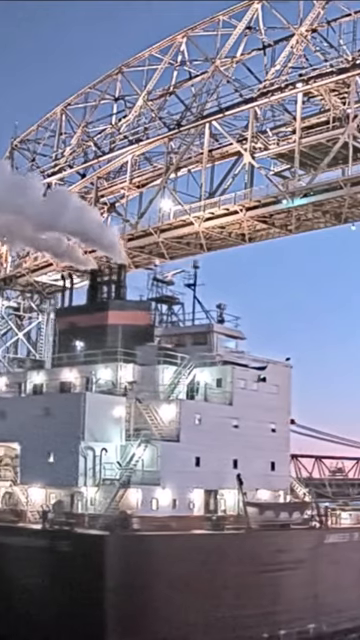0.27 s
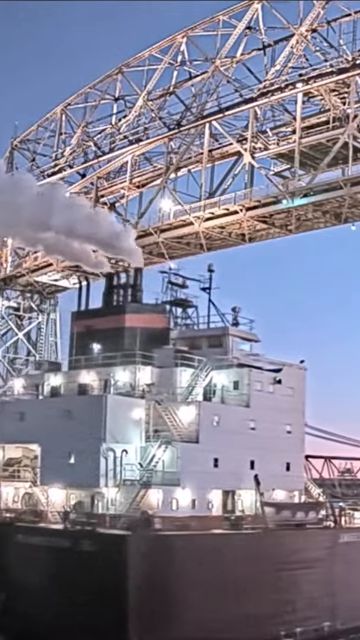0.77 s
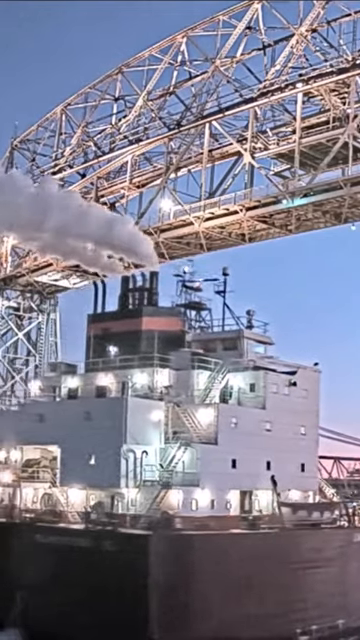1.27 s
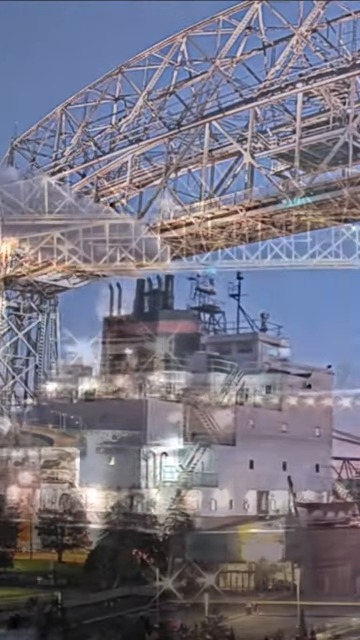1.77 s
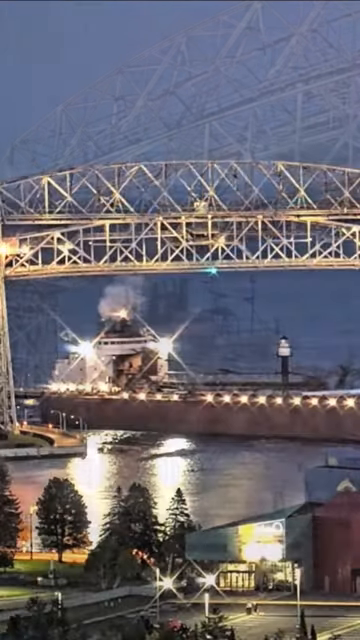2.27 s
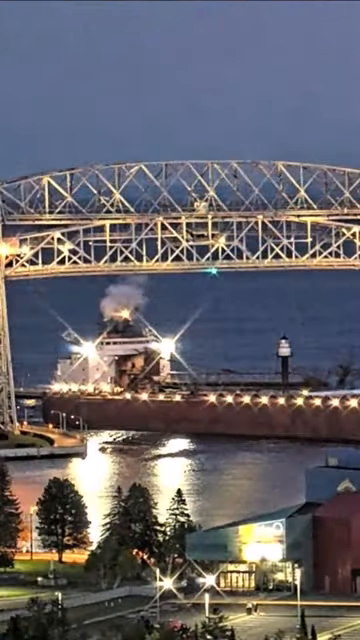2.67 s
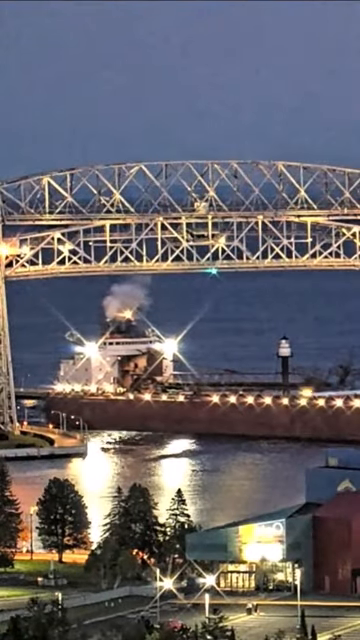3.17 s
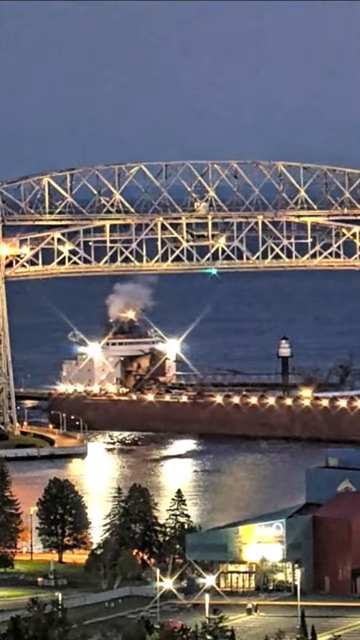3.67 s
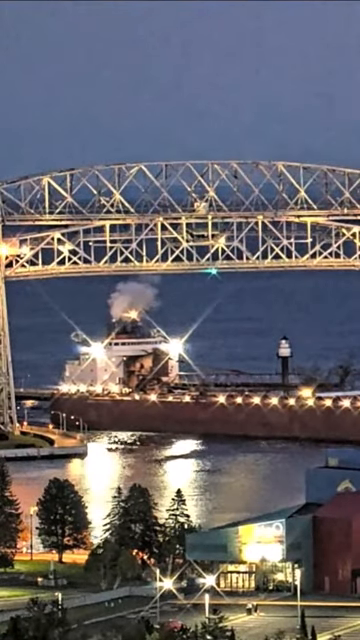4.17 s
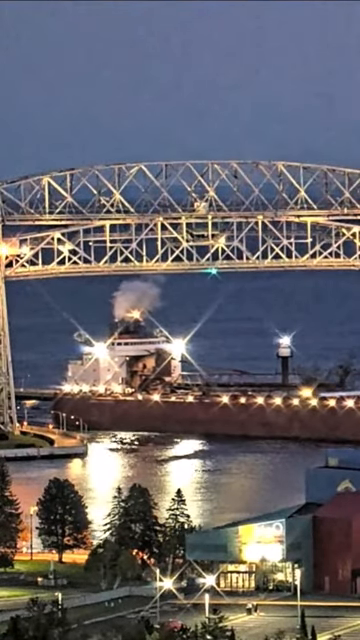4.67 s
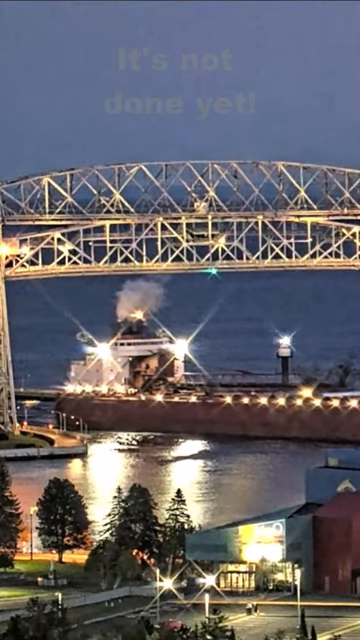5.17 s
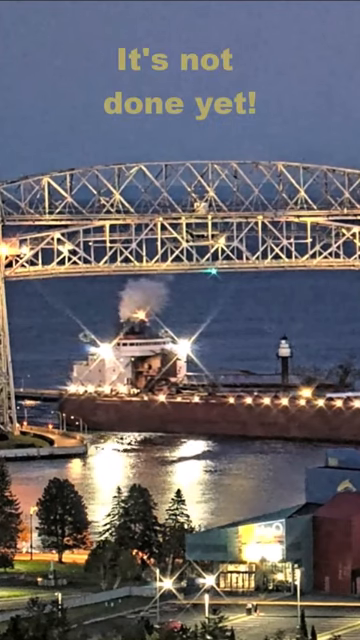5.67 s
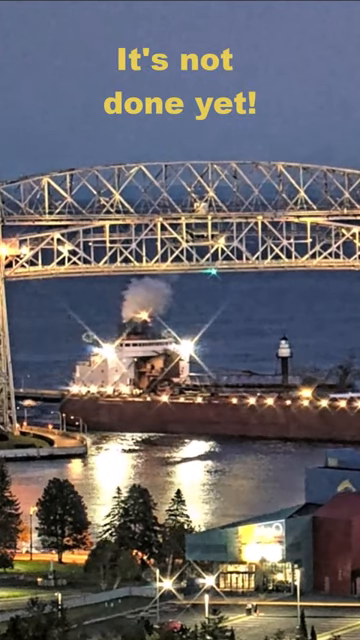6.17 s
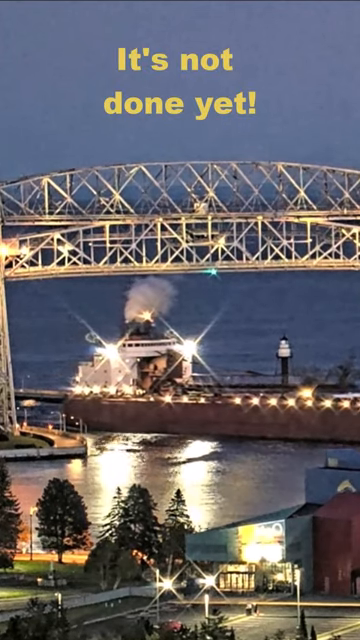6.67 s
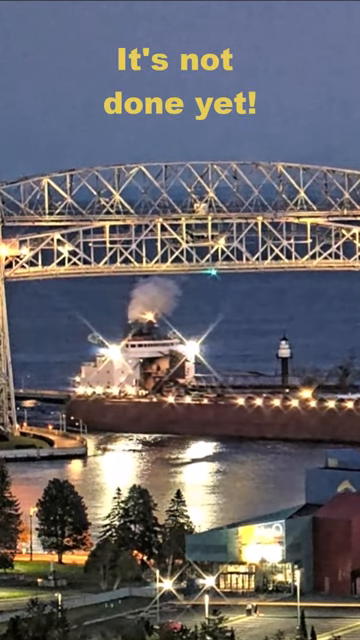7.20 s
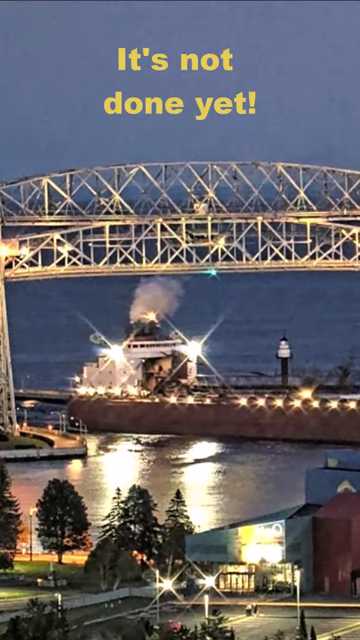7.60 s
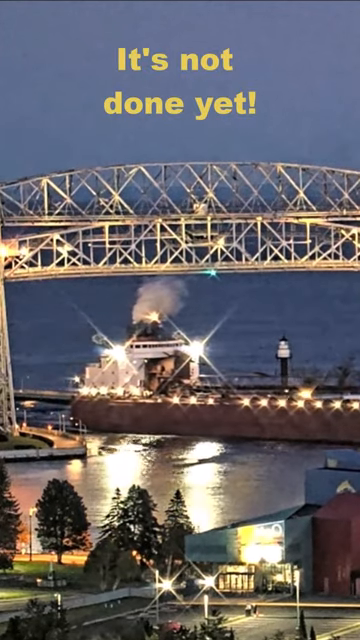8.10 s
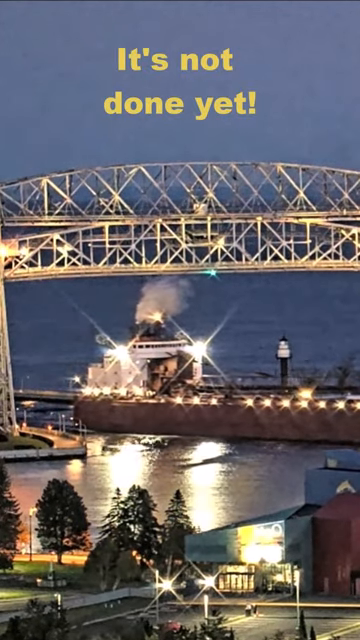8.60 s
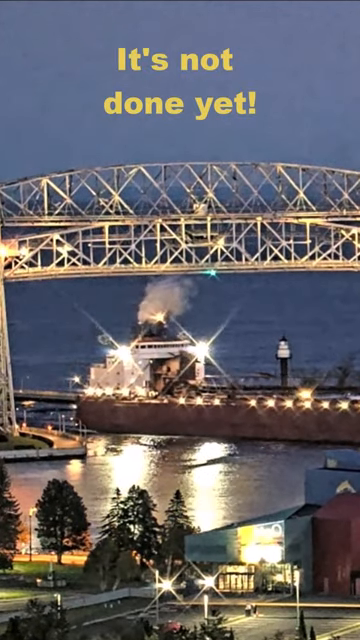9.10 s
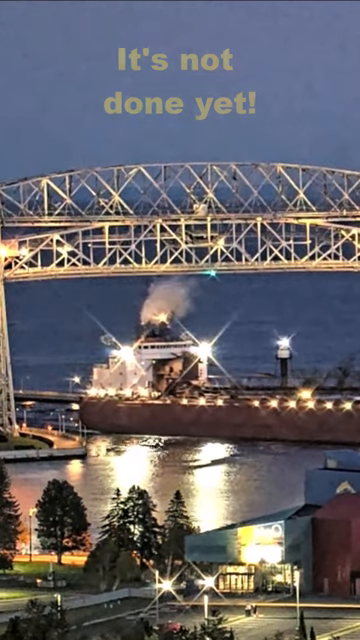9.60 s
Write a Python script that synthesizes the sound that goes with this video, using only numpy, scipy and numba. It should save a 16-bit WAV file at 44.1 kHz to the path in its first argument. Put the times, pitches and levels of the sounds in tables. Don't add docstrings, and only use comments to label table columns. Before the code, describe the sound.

After a second of wind and handling rustles, a ship's steam horn blares, then a deeper one joins in one long, overloaded harbor blast.

```python
import sys
import numpy as np
from scipy import signal
from scipy.fft import rfft, irfft, dct
from scipy.io import wavfile
from scipy.ndimage import map_coordinates
from numba import njit

SR = 44100
rng = np.random.default_rng(int(sys.argv[2]) if len(sys.argv) > 2 else 0)


def makeup_ratio(level_db):
    decades = np.asarray(level_db, float) / 20
    return 10 ** decades


def output_pcm(signal):
    pcm = np.clip(np.atleast_2d(signal).T, -1, 1) * 32767
    wavfile.write(sys.argv[1], SR, np.round(pcm).astype(np.int16))


N = 434385
TIME = np.arange(N) / SR
SLOW = TIME[::64]

# partial number, usual level in dB.
HIGH_BELL = [(1, -32), (2, -39), (3, -31.5), (4, -23), (5, -17), (6, -28.5), (7, -38), (8, -64), (9, -46),
             (10, -46), (11, -50), (12, -39.5), (13, -42.5), (14, -50.5), (15, -34), (16, -37.5), (17, -39),
             (18, -52.5)]
DEEP_BELL = [(1, -30), (2, -15.5), (3, -20), (4, -24), (5, -34), (6, -18.5), (7, -20.5), (8, -22),
             (9, -27.5), (10, -28), (11, -29), (12, -28.5), (13, -29.5), (14, -39.5), (15, -39.5),
             (16, -39.5), (17, -33.5), (18, -37)]
# centre in Hz, width in Hz, lag in half turns (negative leads).
HIGH_RING = [(590, 110, 1.15), (930, 150, -1), (1750, 400, 1)]
DEEP_RING = [(580.5, 122, 0.83), (2724, 133, 1.08)]
# delay at mid-blast in ms, drift in ms per s, share.
HIGH_ECHOES = [(16.373, -0.213, 0.238), (24.263, -0.658, 0.079), (31.64, 0.725, -0.129),
               (36.759, -0.335, 0.246), (44.76, -0.231, 0.258)]
DEEP_ECHOES = [(22.14, -0.088, -0.55), (31.9, -0.205, 0.09), (39.65, 0.655, 0.23), (57.76, 0.211, -0.28),
               (67.87, -0.19, 0.36), (87.92, -0.006, 0.85), (96.56, 0.64, 0.22)]
# at mid-blast in Hz, sag in Hz per s, initial sharpness in Hz, its start in s, settling in s.
HIGH_PITCH = (116.045, .0125, 2.0, 1.095, .11)
DEEP_PITCH = (76.732, .008, 1.5, 1.83, .14)
# opens at s, opening in s, bell speaks fully at s, rise in dB per s per partial, mutter before in dB.
HIGH_VALVE = (1.08, .03, 1.13, 110, -30)
DEEP_VALVE = (1.47, .2, 1.96, 22, -24)
# time in s, level in dB.
DEEP_CRACK = [(1.8, -0.5), (2.5, -1), (3.5, 0.5), (4.5, 1), (5.6, -2), (6.2, -0.5), (6.7, 2.5), (7.3, 3),
              (8, 3.5), (9, 0), (9.85, 0.5)]
# frequency in Hz, density in dB per Hz.
STEAM_SPECTRUM = [(40, -3), (100, -1), (300, -9.5), (600, -2), (1000, -15), (2000, -19), (4000, -26),
                  (9000, -35.5)]
# time in s, excess in dB.
EXCESS = [
    (1.1, 0.5),
    (1.5, 1),
    (1.85, 3.5),
    (2.0, 3.5),
    (9.85, 3),
]


def horns():
    high = horn(HIGH_PITCH, HIGH_VALVE, HIGH_BELL, HIGH_ECHOES, HIGH_RING, start=0.24, lead=1.52, fall_db=-43,
                smear=0, flutter=.09, drift=.35, puff_db=-45, order=6, count=23)
    crack_db = np.interp(SLOW, *np.transpose(DEEP_CRACK), left=0)
    deep = horn(DEEP_PITCH, DEEP_VALVE, DEEP_BELL, DEEP_ECHOES, DEEP_RING, start=0.2765, lead=0.73, fall_db=-10,
                smear=0.00419, flutter=0.057, drift=0.38, crack_db=crack_db, puff_db=-31.5, order=8, count=70)
    flow = np.interp(TIME, (1.08, 1.13, 1.8, 2.0), (0, .45, .55, 1))
    leak = makeup_ratio(-32) * flow * noise(STEAM_SPECTRUM)
    excess_db = np.interp(TIME, *np.transpose(EXCESS), left=0)
    return (high + deep + leak) * makeup_ratio(excess_db)


# frequency in Hz, density in dB per Hz.
PUFF_SPECTRUM = [(1500, -18), (2500, 6), (5000, 1), (9000, -7), (15000, -20)]


def horn(pitch, valve, bell, echoes, ring, start, lead, fall_db, smear, flutter, drift,
         crack_db=0, puff_db=-50, order=6, count=44):
    mid_s = 6
    mid_hz, sag, sharp_hz, from_s, settle_s = pitch
    sharpness = sharp_hz * np.exp(-np.maximum(TIME - from_s, 0) / settle_s)
    pitch_hz = mid_hz - sag * (TIME - mid_s) + sharpness
    phase = start + 2 * np.pi * np.cumsum(pitch_hz) / SR

    opens_s, opening_s, speaks_s, rise_db, mutter_db = valve
    flow = np.clip((SLOW - opens_s) / opening_s, 0, 1) ** 2
    usual_db = dict(bell)
    slow = np.zeros((len(SLOW), count), complex)
    for k in range(1, count + 1):
        f = k * mid_hz
        beyond_db = bell[-1][1] + fall_db * np.log2(k / len(bell))
        db = usual_db.get(k, beyond_db) + crack_db * (k > len(bell) / 2)
        db = db + np.clip(rise_db * min(k, order) * (SLOW - speaks_s), mutter_db, 0)
        lag = smear * k ** 2
        for hz, width, half_turns in ring:
            lag += half_turns * np.arctan2(f * width, hz ** 2 - f ** 2)
        loose = drift * max(k - order, 0) / (k + 1) * walk(1.512, SLOW)
        size = np.sqrt(2) * makeup_ratio(db + 0.97 * loose) * (1 + flutter * walk(30, SLOW))
        shift = lead - lag + loose + flutter * (1 + k / 12) * walk(25, SLOW)
        if k <= order:
            paths = 1
            for ms, slide, share in echoes:
                delay_s = (ms + slide * (SLOW - mid_s)) / 1000
                paths = paths + share * np.exp(-2j * np.pi * f * delay_s)
            size = size * np.abs(paths)
        slow[:, k - 1] = flow * size * np.exp(1j * shift)

    effort_db = puff_db + crack_db + np.clip(rise_db * order * (SLOW - speaks_s), mutter_db, 0)
    puff = np.exp(2.2 * (np.cos(phase - .5) - 1))
    gate = np.interp(TIME, SLOW, flow * makeup_ratio(effort_db)) * puff
    return partials(phase, slow) + gate * noise(PUFF_SPECTRUM, 1500, 16000)


@njit
def partials(phase, slow):
    out = np.zeros(len(phase))
    for i in range(len(phase)):
        j, u = min(i // 64, len(slow) - 2), (i % 64) / 64
        base = np.exp(1j * phase[i])
        z = base
        for k in range(slow.shape[1]):
            out[i] += ((slow[j, k] + u * (slow[j + 1, k] - slow[j, k])) * z).real
            z *= base
    return out


# start in s, hold in s, body level in dB, low level in dB, high level in dB.
RUSTLES = [
    (.285, .02, -60, -66, -76),
    (0.625, 0.087, -44.5, -48, -67),
    (.91, .05, -48.5, -56, -86),
    (1.047, 0.084, -46, -48, -73),
]


def rustles():
    attack_s, fade_s = .015, .045
    low_shape = [(900, -6.5), (1200, 5), (1400, -6), (1650, 3), (1900, -5), (2400, -24)]  # Hz, dB per Hz
    high_shape = [(4000, -15), (5300, 1), (7500, -17)]
    body = makeup_ratio(2.0 * walk(100)) * band(500, 100)
    low = makeup_ratio(1.5 * walk(120)) * noise(low_shape, 870, 2400)
    high = makeup_ratio(2.3 * walk(150)) * noise(high_shape, 4200, 7600)
    out = np.zeros(N)
    for s, hold_s, body_db, low_db, high_db in RUSTLES:
        attack = np.clip((TIME - s) / attack_s, 0, 1)
        fade = np.exp(-np.maximum(TIME - s - hold_s, 0) / fade_s)
        out += attack * fade * (makeup_ratio(body_db) * body + makeup_ratio(low_db) * low + makeup_ratio(high_db) * high)
    return out


# middle in s, length in s, pitch in Hz, level in dB.
SQUEAKS = [
    (.3, 0.035, 2650, -69),
    (.68, 0.07, 2620, -63),
    (.66, 0.037, 5300, -64),
    (1.066, 0.045, 2470, -57),
]


def squeaks():
    out = np.zeros(N)
    for s, length_s, hz, db in SQUEAKS:
        shape = np.clip((length_s / 2 - np.abs(TIME - s)) / .006 + .5, 0, 1)
        out += makeup_ratio(db) * shape * band(hz, 120)
    return out


# frequency in Hz, density in dB per Hz.
WIND_SPECTRUM = [(3.5, -33), (6.0, 3), (22, -5), (29, -3), (38, -16), (120, -14), (160, -53), (260, -120)]
# peak time in s, peak level in dB.
GUSTS = [
    (.02, -31),
    (.15, -55),
    (.3, -40),
    (.44, -49),
    (.55, -47),
    (.62, -43),
    (.9, -41),
    (.98, -48),
]


def wind():
    gust_s, calm_db = 0.045, -44
    level = np.full(N, makeup_ratio(calm_db))
    for s, db in GUSTS:
        level += makeup_ratio(db) * np.exp(-((TIME - s) / gust_s) ** 2)
    return level * noise(WIND_SPECTRUM, lo_hz=6, hi_hz=110)


# frequency in Hz, density in dB per Hz.
HARBOUR_SPECTRUM = [(8.8, -33), (15, 8), (25, -31), (37, -21), (142, -16.5), (186, -23.5), (230, -20.5),
                    (270, -23), (414, -24.5), (603, -15.5), (809, -38), (1760, -44.5), (3090, -92),
                    (4370, -110), (9000, -72), (11700, -105), (19800, -120)]
# centre in Hz, width in Hz, level in dB.
HUM_PEAKS = [(140, 13, -55), (590, 25, -55.5), (1280, 60, -71), (1760, 60, -67)]


def harbour_hum():
    hum = makeup_ratio(-44.5 + 0.73 * walk(45)) * noise(HARBOUR_SPECTRUM, lo_hz=110)
    for hz, width, db in HUM_PEAKS:
        hum += makeup_ratio(db + 1.5 * walk(40)) * band(hz, width)
    return hum


def walk(rate_hz, time=TIME):
    knots = rng.standard_normal(int(rate_hz * N / SR) + 3)
    return 0.89 * map_coordinates(knots, [time * rate_hz], order=2)


def noise(shape, lo_hz=10, hi_hz=20000):
    hz = np.arange(N // 2 + 1) * SR / N + 1e-3
    f, db = np.transpose(shape)
    edges = 1 / np.sqrt((1 + (lo_hz / hz) ** 12) * (1 + (hz / hi_hz) ** 12))
    gain = makeup_ratio(np.interp(np.log(hz), np.log(f), db)) * edges
    x = irfft(rfft(rng.standard_normal(N)) * gain, N)
    return x / x.std()


def band(hz, width_hz):
    b, a = signal.iirpeak(hz, hz / width_hz, fs=SR)
    x = signal.lfilter(b, a, rng.standard_normal(N))
    return x / x.std()


def scene():
    return (horns() + rustles() + squeaks() + wind() + harbour_hum())[None]


def band_limit(x):
    return signal.sosfilt(signal.butter(12, 15730, fs=SR, output="sos"), x)


STARVED_S = [.105, .435, 0.521, .655, 1.06, 1.437, 1.551, 1.593, 1.732, 2.177, 2.266, 2.64, 4.102, 4.358,
             5.357, 6.029, 7.247, 8.39, 8.561, 9.041, 9.158, 9.48, 9.722]


def record(dry):
    top, knee = .41, 12.0
    x = dry[0] / (1 + np.abs(dry[0] / top) ** knee) ** (1 / knee)
    x = signal.lfilter(*signal.butter(1, 12, "high", fs=SR), x)

    camera_hz = 48000
    early = (np.arange(N) * camera_hz / SR) % 1 - .5
    x = x - early * np.gradient(x) * SR / camera_hz
    x = signal.lfilter(*signal.butter(1, 14000, fs=SR), x)

    packet_s, coarseness = .022, .16
    half = int(packet_s * SR)
    window = np.sqrt(np.hanning(2 * half))
    for s in STARVED_S:
        part = slice(int(s * SR) - half, int(s * SR) + half)
        lines = dct(x[part] * window, norm="ortho")
        step = coarseness * min(x[part].std() * 5, 1)
        rounded = np.floor(np.abs(lines / step) ** .4 + .4) ** (1 / .4)
        kept = np.sign(lines) * step * rounded
        x[part] += .88 * window * dct(kept - lines, type=3, norm="ortho")
    return band_limit(x[None])


dry = scene()
out = record(dry)
output_pcm(out)
```